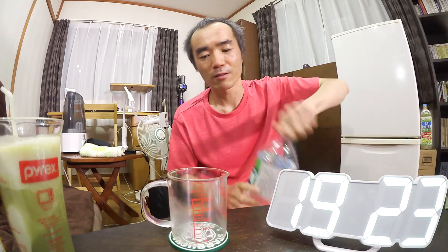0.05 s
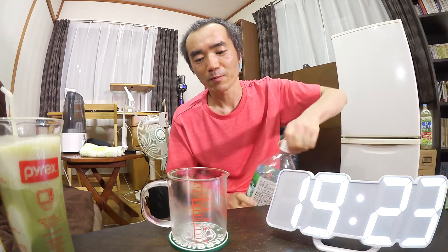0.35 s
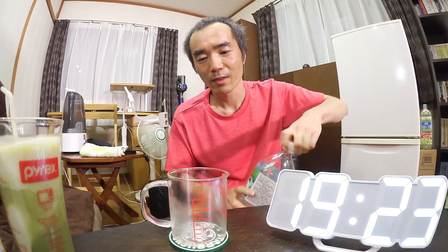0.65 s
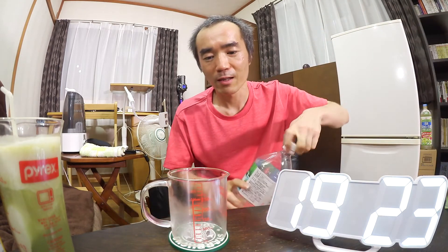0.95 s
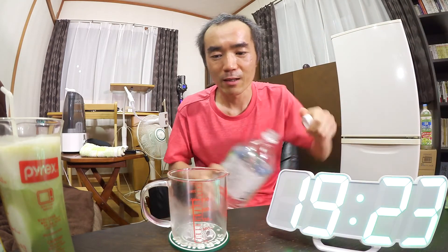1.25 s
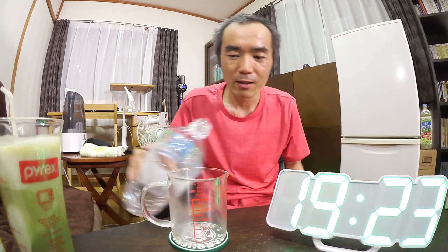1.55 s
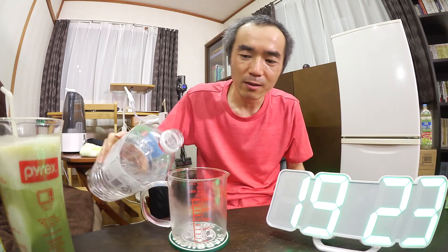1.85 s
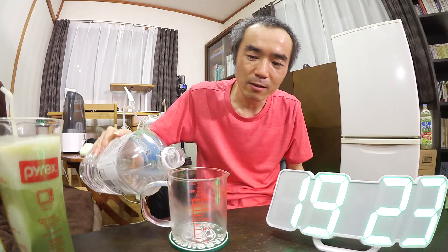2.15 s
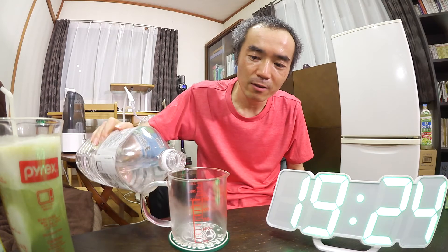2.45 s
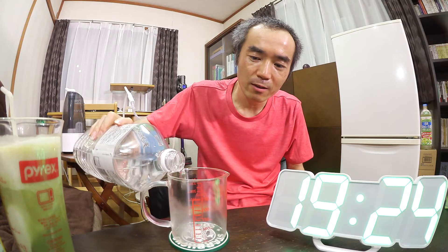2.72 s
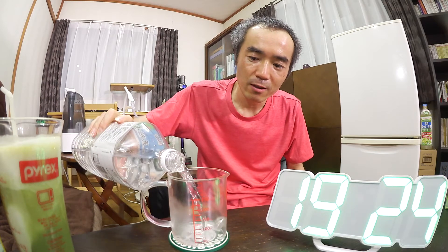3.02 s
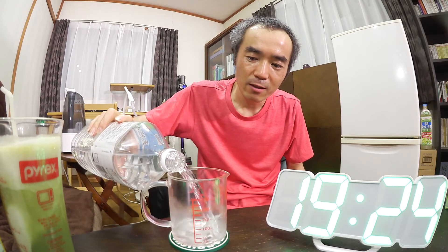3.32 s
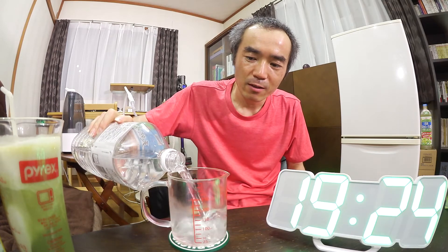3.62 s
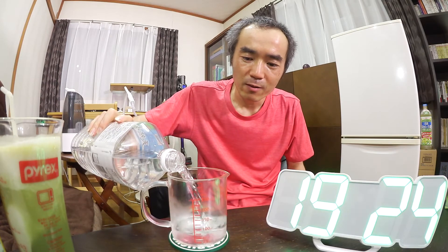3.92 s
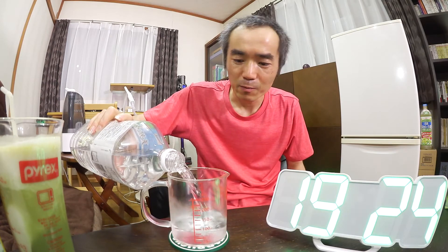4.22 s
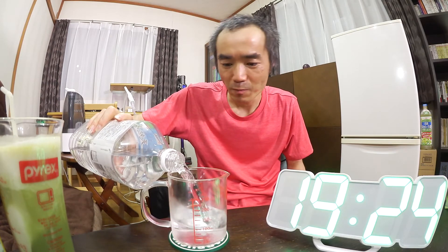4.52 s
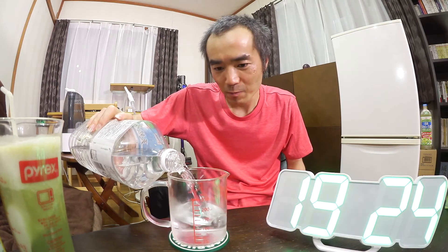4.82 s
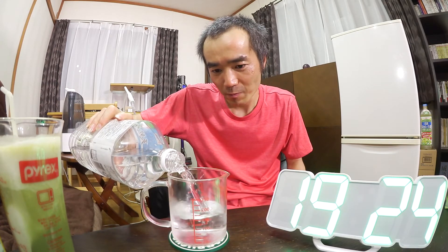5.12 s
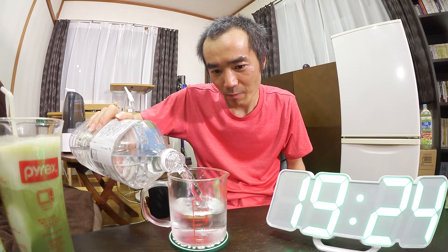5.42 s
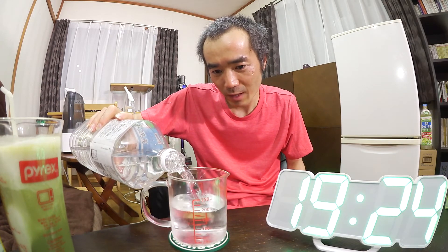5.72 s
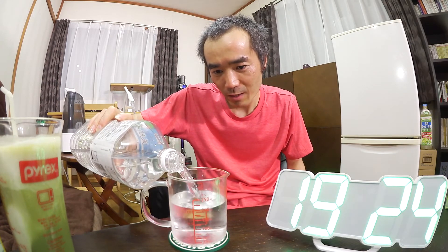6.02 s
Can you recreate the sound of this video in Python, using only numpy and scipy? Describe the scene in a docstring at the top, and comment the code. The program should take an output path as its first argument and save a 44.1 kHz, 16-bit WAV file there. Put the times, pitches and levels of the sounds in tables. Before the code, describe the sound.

A plastic bottle crackles and knocks on a glass jug, then water trickles in with small bubbly plinks over a faint fan hum.

```python
"""First a thin plastic bottle crackles as its cap is twisted off and dents pop in its wall.
Near 2 s it is tipped: the water laps inside, then the neck knocks four times on a glass jug.
From 3.3 s a thin stream runs into the jug. Trapped air rings as bubbles: small ones plink,
and a big one gulps at 3.7 s. Near the end the bottle crinkles again.
All the while a fan hums in the small room."""
import sys
import numpy as np
from scipy import signal
from scipy.fft import rfft, irfft
from scipy.io import wavfile
from scipy.ndimage import map_coordinates

SR = 44100
rng = np.random.default_rng(int(sys.argv[2]) if len(sys.argv) > 2 else 0)


def transcribe(signal):
    """Save signal, clipped to [-1, 1], as a 16-bit WAV file at the path in sys.argv[1]."""
    frames = np.atleast_2d(signal).T
    limited = np.clip(frames, -1, 1)
    pcm = np.round(limited * 32767).astype(np.int16)
    wavfile.write(sys.argv[1], SR, pcm)


N = 271920
TIME = np.arange(N) / SR
AGE = TIME[:SR // 3]   # seconds since a short sound began

# The tones of the half-filled bottle, then those of its wall.
# Each row: pitch in Hz, level in dB, ring time in seconds ("t60", the time to fade by 60 dB).
HOLLOW_TONES = [(120, -16.5, 0.24), (149, -8, 0.031), (180, -3.5, 0.033), (256.5, -0.5, 0.049),
                (291.5, -0.5, 0.082), (378, -9.5, 0.11), (536, 2.5, 0.056)]
WALL_TONES = [(521, 2, 0.099), (719, 0.5, 0.043), (710, 4.5, 0.042), (1070, 12, 0.0067), (1190, -31, 0.029),
              (1345, -2, 0.07), (1640, -31, 0.0084), (1710, -6, 0.022), (1960, -2.5, 0.013),
              (2470, 1.5, 0.011), (2670, -31, 0.015)]
# The colour of a sharp crack, then of a clack (the wall's many higher ripples merged).
# Each row: frequency in Hz, level in dB.
CRACK_COLOUR = [(1500, -6.5), (3000, -3.5), (4000, 0.5), (6500, -1), (9000, -1), (11500, -6), (14000, -19),
                (16500, -71)]
CLACK_COLOUR = [(150, -11.5), (300, -4), (650, 0.5), (900, -2.5), (1350, 0), (2100, -3.5), (2750, 0),
                (3300, -10.5), (5500, -31), (12000, -40.5)]
def dent(crack_db, wall_db, thump_db, panel_hz):
    """The wall buckles: it thumps the air inside, rings, snaps a panel, clacks and cracks."""
    folds = fading_noise(0.0085)[:SR // 50]   # the buckle runs through many tiny folds
    wall = signal.fftconvolve(struck(WALL_TONES, detune=0.0825, spread_db=-4), folds)[:len(AGE)]
    thump = soften(struck(HOLLOW_TONES, detune=0.065, spread_db=2.5), cut_hz=270)
    panel = hump(burst(0.03, spike=8.9, spectrum=CLACK_COLOUR), panel_hz, breadth=0.1)
    clack = burst(0.023, spike=3.4, spectrum=CLACK_COLOUR)
    # a broad dent moves more wall and cracks lower
    crack_hz = np.clip(3250 * 2 ** ((crack_db - wall_db) / 13.5), 2700, 7700)
    crack = hump(burst(0.0069, spike=0.69, spectrum=CRACK_COLOUR), crack_hz, breadth=0.74)
    return (from_db(thump_db - 4) * onset_one(thump)
            + from_db(wall_db - 10) * onset_one(soften(wall, cut_hz=2000))
            + from_db(wall_db - 7) * onset_one(panel)
            + from_db(wall_db - 5.5) * clack
            + from_db(crack_db + 2) * peak_one(crack))


# Each row: start in seconds, crack, wall and thump levels in dB, panel pitch in Hz.
DENT_POPS = [(0.1623, -18.5, -35, -42.5, 1800), (0.207, -25.5, -37.5, -58, 700),
             (0.2183, -20.5, -32.5, -35, 2320), (0.241, -30, -42, -37.5, 710),
             (0.3365, -28, -43.5, -40, 1700), (0.385, -45, -51, -36.5, 830), (0.4391, -24, -38, -62, 860),
             (0.525, -28, -38.5, -40, 990), (0.5306, -40, -30.5, -46, 1300),
             (0.5431, -17.5, -41, -35, 1630), (0.5468, -11.5, -34.5, -43, 585),
             (0.6115, -40, -38.5, -32.5, 660), (0.7611, -21.5, -23.5, -27, 1160),
             (0.874, -39, -34.5, -47, 1290), (0.888, -23, -23.5, -56, 1750),
             (0.9021, -36, -29.5, -59, 1550), (0.9317, -27, -36, -41, 1130),
             (0.9605, -32, -32.5, -25.5, 1370), (0.9792, -26, -37.5, -45, 1700),
             (1.009, -31.5, -44, -56, 1060), (1.03, -35, -39, -38.5, 670), (1.05, -29, -33, -52, 2380),
             (1.1013, -34.5, -41, -50, 1250), (1.138, -41, -45, -52, 1250), (1.1544, -30, -32, -32, 1250),
             (1.1763, -28.5, -34.5, -34, 2350), (1.1893, -46, -35, -25, 1300),
             (1.1924, -35, -25, -24.5, 1300), (1.1998, -27.5, -30, -31, 1470),
             (1.8942, -49, -45, -62, 1280), (1.947, -29, -39, -48, 685), (2.0295, -27.5, -43, -40.5, 666),
             (2.0892, -25.5, -43.5, -42, 1400), (2.1017, -32, -42.5, -46, 630),
             (2.168, -24, -43, -40.5, 1320), (2.1936, -37, -41.5, -45, 2760),
             (2.2648, -22.5, -36.5, -39.5, 675), (2.855, -42, -54, -62, 2620), (5.848, -45, -52, -66, 1340),
             (5.9288, -27.5, -40.5, -65, 2970)]
def dents():
    """Dents pop in and out of the bottle, each with a slightly different tuning."""
    out = np.zeros(N)
    for s, *settings in DENT_POPS:
        add(out, s, dent(*settings))
    return out


# Each row: strongest moment in seconds, wall level in dB, crack level in dB.
HAND_TWISTS = [(0.0, -47.5, -33), (0.26, -71, -46.5), (0.39, -54, -48.5), (0.806, -43, -36.5),
               (0.93, -71, -56), (1.058, -53, -57), (1.115, -68, -56), (1.18, -61, -61)]
def crinkle():
    """Each twist of the hands sets off fine creases, which shake the wall and the hollow inside."""
    times, wall_db, crack_db = np.transpose(HAND_TWISTS)
    creases = grains(per_s=1600, spread_db=-7.5)
    # the fingers damp the wall and blur its tones
    wall = soften(struck(WALL_TONES, detune=0.05, spread_db=1) * dying(0.014), cut_hz=3000)
    hollow = hump(struck(HOLLOW_TONES, detune=0.015, spread_db=-0.5), hz=273, breadth=0.21)
    body = from_db(-2) * through(creases, wall) + from_db(-4) * through(creases, hollow)
    cracks = rms_one(colour(creases, CRACK_COLOUR))
    return (body * swells(times, wall_db, rise_db_per_s=197, fall_db_per_s=90)
            + cracks * swells(times, crack_db - 3, rise_db_per_s=197, fall_db_per_s=238))


# Each row: start in seconds, level in dB, pitch in Hz.
PLASTIC_TICKS = [(0.1623, -16, 5800), (0.2208, -14, 3700), (0.2418, -22, 3720), (0.3418, -27.5, 6070),
                 (0.5057, -9.5, 7900), (0.5346, -14, 7000), (0.5398, -19, 6600), (0.546, -18, 7450),
                 (0.6918, -19.5, 9870), (0.7002, -16, 10400), (0.7497, -13, 6100), (0.756, -22, 8500),
                 (0.9328, -16, 5130), (0.9665, -18.5, 7150), (0.9725, -32, 8400), (1.011, -31, 8000),
                 (1.9487, -34, 5500), (2.0299, -40, 5200), (2.0885, -39, 6000), (2.1024, -30, 6100),
                 (2.1672, -29, 4930), (2.1938, -29, 6100), (2.266, -34, 7500), (5.687, -36, 9500),
                 (5.8738, -34, 5600), (5.9206, -19.5, 5240), (5.931, -22.5, 4860), (5.951, -32, 5540),
                 (5.962, -29, 9150), (5.9803, -23.5, 8900), (6.0233, -31.5, 8250)]
def ticks():
    """Creases and the cap's ring flip in under a millisecond, giving thin, dry ticks."""
    out = np.zeros(N)
    for s, db, hz in PLASTIC_TICKS:
        flip = (AGE == 0) + 0.016 * fading_noise(0.00055)
        tick = hump(hump(flip, hz, breadth=0.16), hz, breadth=1)
        add(out, s, from_db(db - 1) * peak_one(tick))
    return out


# The tones of neck, jug and table together, then those of the glass alone.
# Each row: pitch in Hz, level in dB, basic ring time in seconds.
THUD_TONES = [(147.6, -8.5, 0.2), (267, -12.5, 0.093), (560, -29, 0.0092), (715, -8.5, 0.071),
              (796, 0, 0.049), (965, -10.5, 0.14), (1332, -10.5, 0.083), (1400, -5.5, 0.024),
              (2470, 6, 0.0048)]
GLASS_TONES = [(3210, -21, 0.1), (3940, -4, 0.125), (6040, -8.5, 0.105), (7540, -17, 0.07),
               (8650, -21, 0.07)]
# The bottle wall's rattle. Each row: frequency in Hz, level in dB.
RATTLE_COLOUR = [(80, -36), (200, 10), (450, -3.5), (850, 7.5), (1400, -4), (2200, -11), (5000, -15),
                 (12000, -63)]
# Each row: start in seconds, thud, glass and tick levels in dB, factor on the glass's ring time.
NECK_KNOCKS = [(2.2998, -24.5, -27, -43, 1.1), (2.407, -20, -31, -42, .4), (2.426, -36, -43, -64, 1.1),
               (2.5461, -31.5, -31, -50, .33)]
def knocks():
    """The soft neck thuds on the rim, the bottle rattles and the glass rings until the neck damps it."""
    out = np.zeros(N)
    for s, thud_db, glass_db, tick_db, ring in NECK_KNOCKS:
        thud = soften(struck(THUD_TONES, detune=0.008, spread_db=1), cut_hz=2700)
        rattle = burst(0.16, spike=10, spectrum=RATTLE_COLOUR)
        glass = struck([(hz, db, t60 * ring) for hz, db, t60 in GLASS_TONES], detune=0, spread_db=3)
        tick = burst(0.014, spike=3.1, spectrum=CRACK_COLOUR)
        add(out, s, from_db(thud_db - 4) * thud + from_db(thud_db - 14) * rattle
            + from_db(glass_db) * glass + from_db(tick_db - 4.5) * tick)
    return out


POUR_START_S, POOL_START_S, TRICKLE_DB = 3.32, 3.82, -67
# Each row: strongest moment in seconds, level in dB.
STREAM_SURGES = [(3.35, -57.5), (3.429, -60), (3.73, -53.5), (3.859, -57.5), (3.963, -51.5), (4.138, -64),
                 (4.29, -62.5), (4.881, -61.5), (5.421, -65), (5.66, -57.5), (5.961, -60.5)]
def flow():
    """The stream's strength: a steady trickle, plus surges that come quickly and settle slowly."""
    surges = swells(*np.transpose(STREAM_SURGES), rise_db_per_s=703, fall_db_per_s=145)
    return from_db(TRICKLE_DB) * (TIME > POUR_START_S) + surges


def with_flow(count):
    """Random moments, most of them where the stream is strong."""
    poured = np.cumsum(flow() ** 2)
    return np.interp(rng.random(count), poured / poured[-1], TIME)


def bare_glass(s):
    """The share of the stream that still hits glass as a pool covers the bottom."""
    return from_db(-np.clip(89 * (s - POOL_START_S), 0, 60))


def by_depth(s, on_glass, in_pool):
    """Slide from one value to another as the pool forms."""
    return in_pool + (on_glass - in_pool) * bare_glass(s)


def bubble(hz, t60, rise, swell_s):
    """A bubble swells and rings; nearing the surface, it climbs by `rise` octaves a second."""
    t60 = max(t60, 0.002)
    age = AGE[AGE < t60]
    pitch = hz * 2 ** np.minimum(rise * age, 1)
    return np.sin(2 * np.pi * np.cumsum(pitch) / SR) * from_db(-60 * age / t60) * np.tanh(age / swell_s)


def plink(s, db, hz):
    """One small bubble. Higher and harder-hit ones die sooner; in the pool they start more softly."""
    hard_hit = 2 ** (min(-40.5 - db, 0) / 13.5)
    t60 = 0.025 * (4000 / hz) ** 0.51 * hard_hit
    swell_s = by_depth(s, on_glass=0.00047, in_pool=0.00095)
    return from_db(db - 2.5) * peak_one(bubble(hz, t60, 3 * rng.random(), swell_s))


def spray(delays, start_s, size, spectrum, ring, spread_db):
    """Many tiny bubbles, each a short upward chirp. A deeper pool holds bigger, lower ones."""
    out = np.zeros(size)
    height, strength, rises = rng.random((len(delays), 3)).T
    lowest_hz = by_depth(start_s + delays, on_glass=2350, in_pool=1290)
    pitches = lowest_hz * (14500 / lowest_hz) ** height
    gains = from_db(at_hz(spectrum, pitches) - spread_db * np.log(strength + 0.011))
    for s, hz, gain, rise in zip(delays, pitches, gains, rises):
        add(out, s, gain * bubble(hz, ring / np.sqrt(hz * 2500), 12 * rise, swell_s=0.00013))
    return out


# The colour of a wet slap, then of tiny splash bubbles. Each row: frequency in Hz, level in dB.
SLAP_COLOUR = [(500, -50), (1500, -66), (2800, 6), (5000, 5.5), (8000, 3), (12000, -1), (15000, -21),
               (16500, -82)]
SPLASH_COLOUR = [(1300, -33), (2200, -1.5), (3200, 3.5), (4500, 3), (7000, 12), (9500, 7.5), (12000, -7),
                 (14500, -2)]
# Each row: start in seconds, bubble level in dB, pitch in Hz, splash level in dB.
CLEAR_DROPS = [(3.331, -31, 4020, -50), (3.3524, -29, 8230, -50.5), (3.37, -40, 3680, -57),
               (3.401, -30, 6470, -57), (3.427, -26.5, 4000, -53), (3.443, -30, 4770, -62.5),
               (3.491, -42, 5560, -82), (3.5383, -37, 5340, -61), (3.561, -34, 5180, -77),
               (3.6153, -25.5, 2950, -54.5), (3.708, -10, 3570, -44), (3.732, -22, 7240, -49),
               (3.757, -31, 12400, -56), (3.767, -29.5, 6130, -57), (3.778, -28, 4000, -59),
               (3.789, -23, 2760, -61), (3.803, -17, 2930, -57), (3.811, -24, 2700, -59),
               (3.8504, -39, 5960, -53), (3.876, -36, 4860, -70), (3.911, -40, 4000, -59),
               (3.924, -37.5, 5500, -68), (3.9726, -34, 2820, -55.5), (3.985, -38, 6340, -70),
               (4.0599, -37, 5010, -51.5), (4.116, -37.5, 5850, -56), (4.2098, -45, 7360, -79),
               (4.2847, -40.5, 2430, -52.5), (4.388, -31, 7310, -61), (4.392, -37, 6040, -66),
               (4.5022, -29, 6000, -56), (4.61, -48.5, 7340, -80), (4.767, -27.5, 6650, -68),
               (4.77, -16.5, 5920, -54), (4.878, -37.5, 6190, -63), (4.886, -30, 2670, -63),
               (4.8918, -33, 7240, -78), (4.937, -43, 11700, -65), (4.9736, -41, 2110, -64),
               (5.1338, -46, 3040, -63), (5.239, -53, 7270, -79), (5.327, -37.5, 6340, -56),
               (5.362, -44, 2220, -62), (5.406, -40, 8500, -53.5), (5.589, -43, 2100, -61.5),
               (5.613, -42, 8180, -62), (5.6408, -32, 7760, -52), (5.653, -36, 3570, -65),
               (5.674, -43, 9700, -74), (5.679, -43, 2980, -70), (5.778, -48, 6030, -75),
               (5.847, -37, 6050, -57), (5.853, -35, 5350, -64), (5.864, -47, 5830, -50.5),
               (5.92, -28.5, 5830, -59), (5.93, -30, 5800, -64), (5.931, -37, 2760, -67),
               (5.934, -33, 5960, -68), (6.098, -42.5, 6670, -59.5)]
def drops():
    """A drop slaps down and pinches off a clear bubble, which sheds a cloud of tiny ones."""
    out = np.zeros(N)
    for s, db, hz, splash_db in CLEAR_DROPS:
        add(out, s, plink(s, db, hz))
        slap = burst(0.033, spike=1.1, spectrum=SLAP_COLOUR)
        add(out, s, from_db(splash_db) * by_depth(s, on_glass=1, in_pool=0.37) * slap)
        delays = rng.exponential(0.007, size=30)
        cloud = spray(delays - delays.min(), s, len(AGE), SPLASH_COLOUR, ring=26, spread_db=5)
        add(out, s, from_db(splash_db + 3) * onset_one(cloud))
    return out


# Each row: start in seconds, pitch in Hz, level in dB, ring time in seconds,
# seconds until it surfaces, rise in octaves a second.
BIG_BUBBLES = [(3.7072, 825, -14.5, .14, .03, 4), (3.765, 790, -38, .2, .014, 2),
               (3.777, 810, -26, .25, .011, 4), (3.789, 840, -16.5, .3, .022, 10),
               (3.812, 1050, -37, .11, .032, 29)]
def gulps():
    """Big pockets of air swell softly and ring; the ring dies fast once a bubble surfaces."""
    out = np.zeros(N)
    for s, hz, db, t60, life_s, rise in BIG_BUBBLES:
        gulp = bubble(hz, t60, rise, swell_s=0.0025)
        surfacing = from_db(-60 * np.maximum(AGE[:len(gulp)] - life_s, 0) / 0.02)
        add(out, s, from_db(db - 1) * gulp * surfacing)
    return out


# Each row: start in seconds, level in dB, pitch in Hz.
BUBBLE_CLUSTERS = [(3.337, -37, 2700), (3.367, -38, 2530), (3.389, -46, 2930), (3.595, -40, 1550),
                   (3.934, -29.5, 2870), (3.954, -37, 2950), (4.115, -37, 2780), (4.7693, -32, 1386),
                   (4.781, -34, 2880), (4.852, -36, 3000), (4.8843, -28.5, 1710), (4.91, -38, 1440),
                   (4.975, -41.5, 1330), (4.975, -40, 3030), (5.61, -40, 1620), (5.6445, -38, 1480),
                   (5.651, -28.5, 1485), (5.672, -41, 1530), (5.693, -45, 1600), (5.734, -46, 1480)]
def gurgles(t60=0.027, spread_octaves=0.164, count=8):
    """Air breaks up under the stream: one bubble, then a few weaker ones near its pitch."""
    out = np.zeros(N)
    for s, db, hz in BUBBLE_CLUSTERS:
        add(out, s, from_db(db - 7) * bubble(hz, t60, rise=2, swell_s=0.000083))
        for delay, step in zip(rng.exponential(0.01, count), rng.standard_normal(count)):
            follower = bubble(hz * 2 ** (spread_octaves * step), t60, rise=1.4, swell_s=0.0017)
            add(out, s + delay, from_db(db - 13) * follower)
    return out


def small_drops(count=16):
    """Lesser bubbles plink at random as the stream surges, fading as the pool forms."""
    out = np.zeros(N)
    for s, (size, pitch) in zip(with_flow(count), rng.standard_normal((count, 2)).clip(-1.5, 1.5)):
        add(out, s, plink(s, db=-43 + 2 * size, hz=5780 * 2 ** (0.29 * pitch)))
    return out * np.sqrt(bare_glass(TIME))


# Each row: bubble pitch in Hz, level in dB.
BURBLE_COLOUR = [(1300, -13), (2200, 11.5), (3100, 14.5), (4300, 0), (6800, 11), (9500, 1), (14500, -28)]
def burble():
    """Thousands of tiny bubbles blend into a soft burble that follows the stream's strength."""
    moments = rng.uniform(POUR_START_S, N / SR, size=3000)
    bubbles = spray(moments, 0, N, BURBLE_COLOUR, ring=18, spread_db=4.5)
    return from_db(-4) * flow() * bubbles / np.std(bubbles[TIME > POUR_START_S])


def spatter():
    """Fine droplets patter densely on the glass until a pool covers the bottom."""
    patter = spray(with_flow(count=1500), 0, N, SPLASH_COLOUR, ring=12, spread_db=5)
    return from_db(TRICKLE_DB + 2) * np.sqrt(bare_glass(TIME)) * rms_one(patter)


def sparkle(low_hz=8000, high_hz=14000, count=50):
    """The tiniest bubbles ping high above the rest, in the thin film on the glass."""
    out = np.zeros(N)
    for s, height, size in zip(with_flow(count), rng.random(count), rng.standard_normal(count)):
        ping = bubble(low_hz * (high_hz / low_hz) ** height, t60=0.019, rise=4, swell_s=0.000067)
        add(out, s, from_db(-48 + 4 * np.clip(size, -2, 2)) * ping)
    return out * by_depth(TIME, on_glass=0.9, in_pool=0.25)


# The jug's tones before it fills. Each row: pitch in Hz, gain in dB, ring time in seconds.
JUG_TONES = [(1390, 12, 0.077), (2430, -17, 0.036), (2880, 1, 0.1), (6130, 9.5, 0.1), (7000, -1, 0.042),
             (7470, 5, 0.061)]
def jug(water, sag_from_s=4.4, sag_octaves_per_s=0.0823):
    """The jug rings along with the water, whose growing weight lowers its tones."""
    sag = 2 ** (-sag_octaves_per_s * np.maximum(TIME - sag_from_s, 0))
    out = water
    for hz, db, t60 in JUG_TONES:
        turn = np.exp(2j * np.pi * np.cumsum(hz * sag) / SR)
        decay = from_db(-60 / (t60 * SR))
        # shift the sliding tone down to 0 Hz, let it linger, then shift it back
        ring = turn * signal.lfilter([1 - decay], [1, -decay], water / turn + 1e-18)
        out = out + 2 * from_db(db) * ring.real
    return out


# Each row: start in seconds, level in dB, pitch in Hz.
WATER_LAPS = [(1.799, -36.5, 1950), (1.821, -34.5, 3480)]
def sloshes():
    """Water laps inside the tilting bottle with a short, dull plip."""
    out = np.zeros(N)
    for s, db, hz in WATER_LAPS:
        lap = hump(fading_noise(0.021), hz, breadth=0.078)
        add(out, s, from_db(db) * peak_one(hump(lap, hz, breadth=0.5)))
    return out


# The motor's hum. Each row: pitch in Hz, level in dB.
MOTOR_HUM = [(60, -72.5), (120, -50.5)]
# Its thin whine. Each row: pitch in Hz, width in Hz, level in dB.
MOTOR_WHINE = [(3820, 26, -71.5), (4150, 144, -71)]
# The air of the fan and the room. Each row: frequency in Hz, level in dB.
AIR_COLOUR = [(20, -101), (55, -93.5), (90, -83), (170, -80), (290, -79.5), (450, -86.5), (700, -91),
              (1150, -90), (1800, -99), (2500, -99), (3500, -105), (9000, -108), (13000, -116),
              (16500, -123)]
def fan():
    """The motor gives a gently wavering mains hum and a thin whine over a soft rush of air."""
    hum = sum(np.sqrt(2) * from_db(db) * np.sin(2 * np.pi * (hz * TIME + rng.random()))
              for hz, db in MOTOR_HUM)
    air = diffuse(AIR_COLOUR, N) * np.sqrt(SR / 2)
    out = air + hum * from_db(0.12 * drift(per_s=4.4))
    for hz, width, db in MOTOR_WHINE:
        band = signal.butter(2, [hz - width / 2, hz + width / 2], "band", fs=SR, output="sos")
        hiss = diffuse([(100, 0), (10000, 0.012)], N)
        out += from_db(db) * rms_one(signal.sosfilt(band, hiss))
    return out


# The colour of the room's echoes. Each row: frequency in Hz, level in dB.
ECHO_COLOUR = [(60, -25), (150, -23), (300, 1.5), (1200, 8.5), (4000, 7), (8000, 5), (12000, 4.5),
               (16000, -2.5)]
def room(x, tail_db, early_db, pan_db=0, lag_s=6e-6):
    """Direct sound, close echoes from the table and things on it, then the room's short tail."""
    fade_in = np.clip((AGE - 0.004) / 0.0051, 0, 1)
    tail = diffuse(ECHO_COLOUR, len(AGE)) * dying(0.26) * fade_in
    early = diffuse(ECHO_COLOUR, len(AGE)) * dying(0.022) * (AGE > 0.001)
    echoes = (from_db(tail_db) * tail / np.linalg.norm(tail[0])
              + from_db(early_db) * early / np.linalg.norm(early[0]))
    # sound from one side reaches the far side of the microphone a little later
    right = map_coordinates(x, [(TIME - lag_s) * SR], order=3)
    direct = np.array([x, right]) * from_db([[pan_db / 2], [-pan_db / 2]])
    return direct + signal.fftconvolve(x[None], echoes, axes=1)[:, :N]


def moving(x, step_s=0.12, count=4, **placing):
    """The bottle keeps moving in the hands, so its echoes blend from one pattern into the next."""
    places = np.arange(count)
    shares = (np.interp(TIME / step_s, places, 1.0 * (places == k), period=count) for k in places)
    return sum(room(x * share, **placing) for share in shares)


# Each row: frequency in Hz, how alike left and right are (1 means the same).
STEREO_LIKENESS = [(50, 0.89), (150, 1), (400, 0.91), (1200, 0.56), (4000, 0.75), (9000, 0.6),
                   (16000, 0.83)]
def diffuse(spectrum, size):
    """Stereo noise from all sides, alike in the bass and less so in the treble."""
    hz = np.fft.rfftfreq(size, 1 / SR)
    alike = np.clip(at_hz(STEREO_LIKENESS, hz), -1, 1)
    mid, side = rfft(rng.standard_normal((2, size))) * from_db(at_hz(spectrum, hz))
    return irfft(mid + np.sqrt((1 - alike) / (1 + alike)) * side * [[1], [-1]], size)


def struck(tones, detune, spread_db):
    """Each blow rings a body's tones with strengths and tunings of its own."""
    chance = rng.standard_normal((len(tones), 3))
    return sum(np.sign(sign) * from_db(db + spread_db * louder) * dying(t60)
               * np.cos(2 * np.pi * hz * (1 + detune * higher) * AGE)
               for (hz, db, t60), (louder, higher, sign) in zip(tones, chance))


def burst(t60, spike, spectrum):
    """A sharp click followed by a short scatter of waves."""
    x = fading_noise(t60)
    x[0] += spike
    return onset_one(colour(x, spectrum))


def grains(per_s, spread_db):
    """Tiny clicks at random times, of very uneven sizes."""
    sizes = from_db(spread_db * np.minimum(rng.exponential(1, N), 4)) * rng.choice([-1, 1], N)
    return rms_one(sizes * (rng.random(N) < per_s / SR))


def swells(times, levels_db, rise_db_per_s, fall_db_per_s):
    """A loudness curve that rises to each level and falls away."""
    return sum(
        from_db(db - np.maximum(rise_db_per_s * (s - TIME), fall_db_per_s * (TIME - s)).clip(0, 120))
        for s, db in zip(times, levels_db))


def drift(per_s):
    """A slow random wander of about size 1."""
    points = rng.standard_normal(4000)
    return rms_one(np.interp(TIME * per_s, np.arange(len(points)), points))


def dying(t60):
    """Fade by 60 dB in t60 seconds, or in a millisecond if t60 is shorter."""
    return from_db(-60 * AGE / max(t60, 1e-3))


def fading_noise(t60):
    """A puff of noise that dies away."""
    return rng.standard_normal(len(AGE)) * dying(t60)


def colour(x, spectrum):
    """Give a sound a colour, with no ringing before it starts (a minimum-phase filter)."""
    size = 4096
    cepstrum = irfft(np.log(from_db(at_hz(spectrum, np.fft.rfftfreq(size, 1 / SR)))))
    cepstrum[1:size // 2] *= 2
    cepstrum[size // 2 + 1:] = 0
    return signal.fftconvolve(x, irfft(np.exp(rfft(cepstrum))))[:len(x)]


def through(x, response):
    """Pass a sound through a ringing body, keeping its power."""
    return signal.fftconvolve(x, response / np.linalg.norm(response))[:N]


def soften(x, cut_hz):
    """Turn down the treble, which rounds off sharp edges."""
    return signal.sosfilt(signal.butter(2, cut_hz, fs=SR, output="sos"), x)


def without_bass(x, cut_hz):
    """A small body gives off little sound below cut_hz."""
    return signal.sosfilt(signal.butter(2, cut_hz, "high", fs=SR, output="sos"), x)


def hump(x, hz, breadth):
    """Keep one band of frequencies around hz."""
    edges = [hz / (1 + breadth), min(hz * (1 + breadth), 0.45 * SR)]
    return signal.sosfilt(signal.butter(1, edges, "band", fs=SR, output="sos"), x)


def at_hz(points, hz):
    """Read between a table's rows, with every octave equally wide."""
    row_hz, values = np.transpose(points)
    return np.interp(np.log(np.maximum(hz, 1)), np.log(row_hz), values)


def add(out, s, sound):
    """Mix a sound in at s seconds."""
    i = max(round(s * SR), 0)
    out[..., i:i + sound.shape[-1]] += sound[..., :max(out.shape[-1] - i, 0)]


def from_db(db):
    """Turn decibels into a gain."""
    return 10 ** (np.asarray(db) / 20)


def rms_one(x):
    """Scale to an average power of 1."""
    return x / np.sqrt(np.mean(x ** 2) + 1e-20)


def onset_one(x):
    """Scale a blow to a power of 1 over its first 8 ms."""
    return x / np.sqrt(np.mean(x[:SR // 125] ** 2) + 1e-20)


def peak_one(x):
    """Scale a blow to a peak of 1."""
    return x / np.abs(x).max()


def scene():
    """The bottle is at arm's length, the jug close to the microphone, the fan behind it all."""
    mix = room(gulps(), tail_db=-18, early_db=-20)
    bottle = without_bass(dents() + crinkle(), cut_hz=83) + sloshes()
    mix += moving(bottle, tail_db=-4.5, early_db=-3.5, lag_s=-21e-6)
    mix += room(ticks(), tail_db=-10, early_db=-8.5, pan_db=-0.5, lag_s=-4.3e-6)
    mix += room(knocks(), tail_db=-15, early_db=-8.5, lag_s=12e-6)
    mix += room(gurgles(), tail_db=-11, early_db=-7, pan_db=0.5)
    water = small_drops() + drops() + burble() + spatter() + sparkle()
    mix += room(jug(water), tail_db=-17, early_db=-7.5, pan_db=-0.5)
    return mix + fan()


def record(dry):
    """The microphone softens the high treble, and everything above 16300 Hz is cut."""
    top_cut = signal.ellip(10, 0.1, 70, 16300, fs=SR, output="sos")
    return signal.sosfilt(top_cut, soften(dry, cut_hz=15500))


dry = scene()
out = record(dry)
transcribe(out)
```